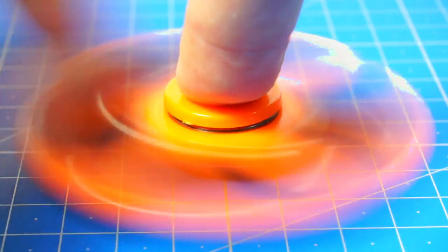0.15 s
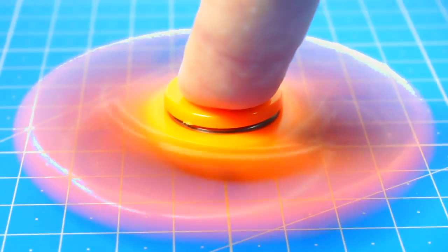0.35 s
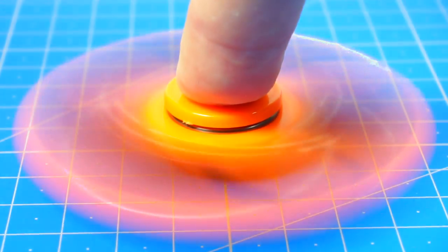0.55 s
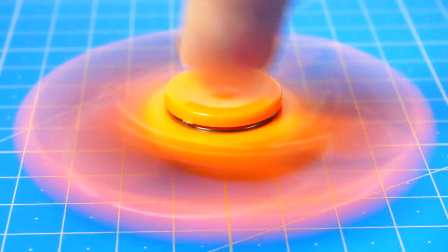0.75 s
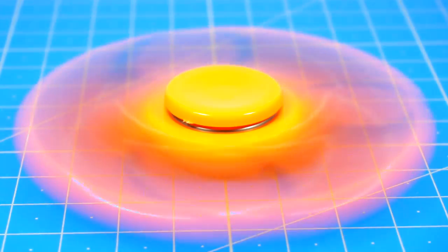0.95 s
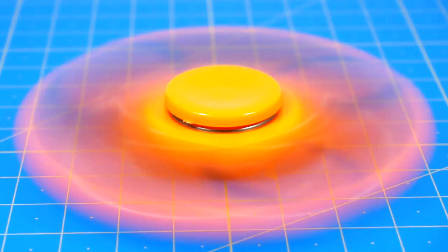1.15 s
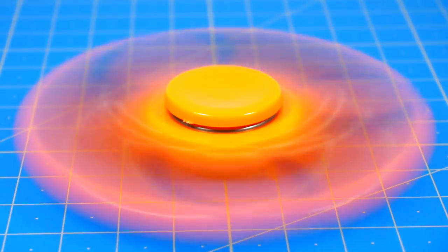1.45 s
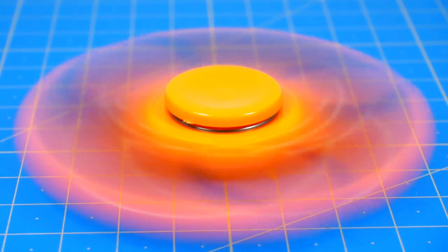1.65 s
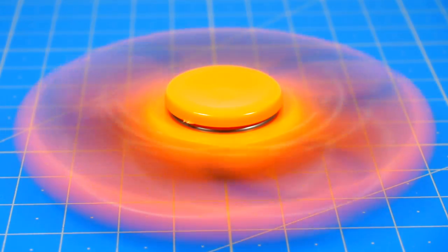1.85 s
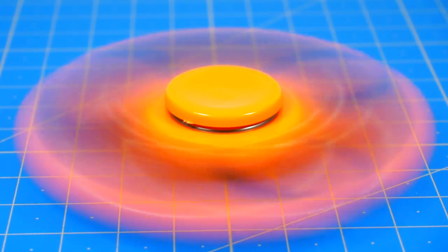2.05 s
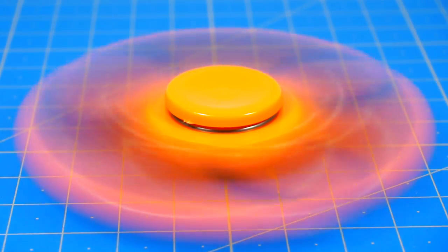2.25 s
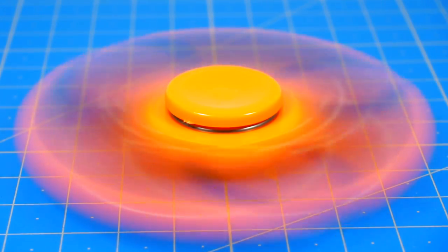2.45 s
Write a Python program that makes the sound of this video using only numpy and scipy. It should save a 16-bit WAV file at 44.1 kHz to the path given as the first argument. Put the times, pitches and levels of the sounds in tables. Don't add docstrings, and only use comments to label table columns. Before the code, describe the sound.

Close up, a finger flicks a plastic spinner, bumping the table; its bearing balls whir continuously, duller at first, then bright and hissy, with tiny ticks and cap chatter over faint low rumble.

```python
import sys
import numpy as np
from scipy import signal
from scipy.fft import rfft, irfft
from scipy.io import wavfile
from scipy.ndimage import uniform_filter1d

SR = 44100
rng = np.random.default_rng(int(sys.argv[2]) if len(sys.argv) > 2 else 0)


def wav_record(signal):
    frames = np.transpose(np.atleast_2d(signal))
    bounded = np.clip(frames, -1, 1)
    quanta = np.round(bounded * 32767).astype(np.int16)
    wavfile.write(sys.argv[1], SR, quanta)


def makeup_ratio(level_db):
    decades = np.asarray(level_db, float) / 20
    return 10 ** decades


N = 114660

# (time [s], rattle level [dB], cap freedom [0-1])
SPIN = [(.225, 5.5, 0), (.24, 7, 0), (.32, 1.5, 0), (.6, -0.5, 0.17), (.73, 0.5, 0.5), (.82, 0, 0.78),
        (1., -0.5, 0.94), (1.3, 1.5, 0.88), (1.75, 1, 0.93), (2.1, .5, 0.95), (2.6, 1, 0.87)]
# (frequency [Hz], width [Hz], held level [dB], free level [dB])
RINGS = [(1032, 67, -52.5, -59), (1445, 145, -47, -79), (2000, 190, -59, -52.5), (2570, 185, -87, -47),
         (3270, 330, -47, -60), (4000, 260, -63, -66), (6060, 610, -64, -54.5), (5160, 450, -55, -52),
         (7120, 640, -65, -46.5), (7896, 490, -60, -41), (9830, 1430, -44.5, -48), (9980, 320, -58, -56),
         (13100, 1600, -57.5, -50.5), (14100, 940, -53.5, -47.5), (15430, 790, -50, -44.5)]
# (lobes [per turn], depth [dB], angle [rad])
RING_LOBES = [(2, 1, 3.1), (1, .3, 0), (2, .6, 0), (1, 2.6, 2.2), (1, .3, 1), (3, .6, .4), (2, 4, -1.4),
              (2, 1.5, -1.4), (2, 4, .2), (1, 2.6, 0), (1, 1, -.7), (3, 1, 1.6), (4, .6, 1.3),
              (3, 1.3, -.1), (3, 2, -.6)]
# (frequency [Hz], width [Hz], depth [0-1])
NOTCHES = [(3270, 150, .5), (5650, 200, .4), (8260, 110, .45), (10650, 300, .45)]
# (frequency [Hz], density [dB])
ROLLING_HISS = [(180, -48), (300, -5), (519, -5), (1430, -6.5), (2590, -6), (3730, -8.5), (7740, -14.5),
                (11000, -14), (15800, -9.5)]
# (time [s], level [dB], length [s])
CAP_RATTLES = [
    (1.575, -38.5, 0.018),
    (1.667, -36, 0.0057),
    (1.998, -39, 0.012),
    (2.162, -37.5, 0.0042),
    (2.176, -35.5, 0.0034),
    (2.334, -42.5, 0.017),
    (2.484, -37, 0.0065),
    (2.496, -39.5, 0.0054),
    (2.512, -32, 0.0052),
]
# (time [s], level [dB], ring frequency [Hz], spread [Hz])
BALL_CATCHES = [(0.2768, -38, 6950, 6000), (0.297, -42, 13600, 2500), (.55, -32.5, 10100, 4000),
                (.58, -41, 9900, 2500), (.6, -39, 9850, 2000), (0.637, -35, 9830, 3000),
                (.642, -36, 9900, 1500), (0.679, -40, 9750, 4000), (.697, -38, 10000, 2500),
                (.7, -28, 15500, 1500), (0.737, -34, 9700, 3000), (0.9595, -35, 7800, 2000),
                (1.7962, -31.5, 7900, 2000), (1.865, -34, 7600, 1200)]
# (time [s], level [dB], length [s], brightness [Hz])
SCRAPES = [(0.2185, -14, 0.0071, 14500), (0.222, -49, 0.0067, 3030), (0.229, -18, 0.0052, 10100),
           (0.2382, -16.5, 0.0038, 7040), (.2435, -13.5, 0.0027, 12100), (0.246, -33.5, 0.026, 4000),
           (0.273, -39.5, 0.036, 1580), (0.3795, -25, 0.00097, 4500), (0.5275, -25, 0.002, 9000),
           (1.576, -39, 0.027, 4000), (2.331, -38, 0.0015, 6000)]
# (frequency [Hz], density [dB])
SKIN_SPECTRUM = [(2000, 15), (5000, 4), (7200, 0), (8800, -1.5), (10200, 6.5), (12000, 5.5), (14000, 0),
                 (16000, 3.5)]
# (time [s], level [dB], lowpass [Hz])
KNOCKS = [
    (.231, -18, 2940),
    (0.2407, -9.5, 4000),
    (0.2448, -13.5, 2880),
    (0.2547, -14, 1750),
    (.268, -14.5, 1990),
    (.286, -15.5, 880),
    (.308, -17.5, 600),
    (.335, -23.5, 1530),
    (.35, -28, 2000),
]
# (frequency [Hz], level [dB], T60 [s])
TABLE_MODES = [(110, -8, 0.17), (170.3, -13, 0.25), (205.7, -7.5, 0.25), (277.4, -1, 0.13),
               (352.6, -2, 0.096), (407, -10, 0.1), (571, -6, 0.085), (721, -20.5, 0.18),
               (780, -10.5, 0.16), (1048, -15, 0.16), (1402, -21, 0.17), (1756, -7.5, 0.061),
               (1795, -24, 0.12), (2030, -18, 0.13)]
# (frequency [Hz], density [dB])
THUD_SPECTRUM = [(80, -19), (250, 7), (2000, -10), (8000, -49)]
# (time [s], level [dB], length [s], frequency [Hz])
SWELLS = [(0.231, -31, 0.0099, 240), (.2418, -7.5, 0.00398, 680), (0.241, -28, 0.0467, 110),
          (.262, -19, .025, 204), (0.271, -19.5, 0.0209, 348), (0.285, -17.5, 0.0157, 285),
          (0.317, -15.5, 0.03385, 290), (0.304, -31.5, 0.0293, 583), (0.347, -34, .04, 602),
          (0.391, -40.5, .03, 745), (.635, -44, 0.034, 523), (0.331, -31, 0.0245, 283),
          (0.387, -57, 0.01, 338), (0.399, -25, 0.013, 355), (0.421, -37.5, 0.037, 390),
          (0.446, -34.5, 0.015, 376), (0.493, -31.5, 0.0126, 369), (0.553, -39.5, 0.014, 347),
          (0.752, -43.5, .04, 601), (0.758, -40.5, .04, 1043), (0.804, -33.5, 0.017, 220),
          (0.823, -40.5, 0.052, 282.6), (0.867, -39.5, .06, 410)]
# (time [s], level [dB])
TABLE_SHAKE = [(0.4, -39), (0.43, -41.5), (0.72, -53.5), (0.82, -35.5), (0.9, -46), (0.98, -39), (1.1, -51),
               (1.16, -42), (1.22, -50.5), (1.35, -50), (1.66, -48.5), (1.69, -42.5), (1.8, -47),
               (1.88, -55), (2.12, -48), (2.15, -63), (2.35, -48.5), (2.6, -50)]
# (time [s], level [dB])
FINGER_PRESS = [
    (.1, -68),
    (.14, -48.5),
    (.21, -43.5),
    (.24, -61),
    (.3, -102),
]
# (frequency [Hz], density [dB])
DRONE = [(60, 3), (120, 4), (200, 8), (400, 1), (600, -7), (1500, -6.5)]
# (frequency [Hz], density [dB])
DRONE_SIDE = [(60, -11), (250, 1.5), (600, -3), (1500, -14.0), (3000, -42)]
# (frequency [Hz], density [dB])
AIR_SPECTRUM = [(15, -26), (25, -11.5), (107, -10.5), (276, -19.5), (371, -18), (513, -22), (710, -22.5),
                (3780, -30.5), (15800, -30)]
# (time [s], level [dB])
TRAFFIC_LEVEL = [(0, -57), (.22, -52), (.27, -43), (.34, -51), (.4, -55), (.5, -59), (1.05, -58),
                 (1.3, -45.5), (1.55, -45), (1.8, -45.5), (2.05, -68), (2.35, -50.5), (2.6, -46)]
# (time [s], gain [dB])
FADE_IN = [
    (0, -9.5),
    (.12, -4),
    (.21, 0),
]


def evened(x):
    return x / np.sqrt(np.mean(x ** 2) + 1e-20)


def curve(rows, axis=1):
    rows = np.array(rows)
    return np.interp(np.arange(N) / SR, rows[:, 0], rows[:, axis])


def noise():
    return rng.standard_normal(N)


def coloured(x, points):
    f_hz, density_db = np.transpose(points)
    hz = np.fft.rfftfreq(N, 1 / SR)
    gain = makeup_ratio(np.interp(np.log(hz + 1), np.log(f_hz + 1), density_db))
    return evened(irfft(rfft(x) * gain, N))


def resonate(x, hz, width_hz):
    r = np.exp(-np.pi * width_hz / SR)
    return signal.lfilter([1, 0, -1], [1, -2 * r * np.cos(2 * np.pi * hz / SR), r * r], x)


def filtered(x, order, hz, kind):
    return signal.lfilter(*signal.butter(order, hz, kind, fs=SR), x)


def drift(length_s):
    size = max(int(length_s * SR), 2)
    smooth = uniform_filter1d(uniform_filter1d(noise(), size), size)
    return evened(np.tanh(evened(smooth) / 2))


def add(mix, start_s, sound):
    part = mix[round(start_s * SR):][:len(sound)]
    part += sound[:len(part)]


def room(x):
    level_db, t60_s, turns_hz = -1.5, 0.25, 7
    t, out = np.arange(SR // 3) / SR, 0
    for k in range(3):
        tail = rng.standard_normal((2, len(t))) * makeup_ratio(-60 * t / t60_s) * (t > .002)
        tail = tail / np.linalg.norm(tail[0])
        share = np.sqrt(2 / 3) * np.cos(2 * np.pi * (np.arange(N) / SR * turns_hz + k / 3))
        out = out + signal.oaconvolve((x * share)[None], tail, axes=1)[:, :N]
    return makeup_ratio(level_db) * out


def spin():
    started = np.arange(N) / SR > SPIN[0][0]
    return makeup_ratio(curve(SPIN)) * started, curve(SPIN, axis=2)


def bearing():
    turns_per_s, slowing_per_s2 = 15.94, .44
    lift_s, lift_length_s, rub_db_per_s = 0.74, .02, 12.5
    flicker_db, lag = 1.63, 17
    hiss_db, hiss_held_db, hiss_same = -37, 5, 0.073
    t = np.arange(N) / SR
    level, free = spin()
    turn = 2 * np.pi * (turns_per_s * t - slowing_per_s2 * t ** 2 / 2)
    lifted = np.clip((t - lift_s) / lift_length_s, 0, 1)
    low, high, drive = cap(), np.zeros(N), ticks()
    for (hz, width_hz, held_db, free_db), (lobes, depth_db, angle) in zip(RINGS, RING_LOBES):
        loose = free
        if 9000 < hz < 11000:
            held_db = held_db + rub_db_per_s * (t - lift_s)
            loose = lifted
        ring = np.roll(drive, rng.integers(N))
        for _ in range(2):
            ring = resonate(ring, hz, 1.47 * width_hz)
        db = held_db + (free_db - held_db) * loose
        db = db + depth_db * np.cos(lobes * turn + angle) + flicker_db * drift(0.0042)
        add(low if hz < 3500 else high, 0, evened(ring) * makeup_ratio(db) * level)
    a, b = (coloured(ticks(), ROLLING_HISS) for side in "lr")
    hiss = np.array([np.roll(hiss_same * b, lag) + a, b])
    hiss = hiss * makeup_ratio(hiss_db - hiss_held_db * free + 1.9 * drift(0.015)) * level
    left = np.roll(low, lag) + high * makeup_ratio(2.0)
    right = low * makeup_ratio(3.0) + high * makeup_ratio(-1.0)
    return notched(np.array([left, right]) + room(low + high) + hiss)


def ticks():
    ticks_per_s, spread_db = 6500, 3.5
    size = makeup_ratio(spread_db * np.minimum(rng.exponential(1, N), 4))
    return evened(size * rng.choice([-1., 1.], N) * (rng.random(N) < ticks_per_s / SR))


def cap():
    level = np.zeros(N)
    for s, db, length_s in CAP_RATTLES:
        add(level, s - length_s / 2, makeup_ratio(db) * np.hanning(int(2 * length_s * SR)))
    return level * evened(resonate(noise(), hz=2514, width_hz=280))


def notched(x):
    hz = np.fft.rfftfreq(N, 1 / SR)
    dips = [1 - depth * np.exp(-((hz - f) / width) ** 2) for f, width, depth in NOTCHES]
    return irfft(rfft(x) * np.prod(dips, axis=0), N)


def catches():
    decay_s = 0.0027
    out, u = np.zeros(N), np.arange(600) / SR
    for s, db, hz, width_hz in BALL_CATCHES:
        puff = rng.standard_normal(600) * np.exp(-u / decay_s)
        add(out, s, evened(resonate(puff, min(hz, 16000), width_hz)) * makeup_ratio(db - 9.5))
    return out + room(out)


def flick():
    skin, wood = scrapes(), knocks()
    sides = makeup_ratio(np.array([[1.5], [-1.5]]))
    return skin * sides + 0.49 * room(skin) + wood + 0.23 * room(filtered(wood, 1, 700, "high"))


def scrapes():
    skin = np.zeros(N)
    for s, db, length_s, hz in SCRAPES:
        u = np.arange(int(3 * length_s * SR)) / (length_s * SR)
        grit = coloured(noise(), SKIN_SPECTRUM)[:len(u)]
        grit = filtered(grit, 2, [hz / 1.63, min(hz * 2.4, 19000)], "band")
        add(skin, s, makeup_ratio(db) * evened(grit) * np.minimum(u / 0.52, 1) * np.exp(-u ** 2))
    return skin


def knocks():
    ring_share, thud_db, thud_t60_s, soft_turns = 0.87, -10.5, 0.16, 1.3
    wood, t = np.zeros(N), np.arange(SR // 2) / SR
    for s, db, hz in KNOCKS:
        body = coloured(noise(), THUD_SPECTRUM)[:len(t)] * makeup_ratio(thud_db - 60 * t / thud_t60_s)
        for mode_hz, mode_db, t60_s in TABLE_MODES:
            decay = makeup_ratio(mode_db - 60 * t / (ring_share * min(t60_s, .4)))
            body = body + rng.uniform(0.13, 1.41) * decay * np.sin(2 * np.pi * mode_hz * t)
        body = body * np.minimum(t * hz / soft_turns, 1)
        add(wood, s, makeup_ratio(db) * filtered(body, 1, [hz / 9, hz], "band"))
    return filtered(wood, 2, 95.3, "high")


def swells():
    out = np.zeros(N)
    for s, db, length_s, hz in SWELLS:
        t = np.arange(int(length_s * SR * 1.37)) / SR
        bloom = np.sin(np.pi * (t / t[-1]) ** 0.61) ** 2
        add(out, s - length_s / 2, makeup_ratio(db) * bloom * np.sin(2 * np.pi * hz * t))
    return out


def table_hum():
    held_db, free_db, lump_db = -50, -50.5, 2
    level, free = spin()
    mode = evened(resonate(noise(), hz=287.7, width_hz=10.8))
    mode = evened(mode / (uniform_filter1d(abs(mode), size=1500) + 0.3))
    shake = makeup_ratio(curve(TABLE_SHAKE) + lump_db * drift(0.11)) * level
    hum = mode * (shake + makeup_ratio(curve(FINGER_PRESS)))
    a = coloured(noise(), [(30, -30)] + DRONE + [(3000, -33.5)])
    b = coloured(noise(), DRONE_SIDE)
    drone = makeup_ratio(held_db + (free_db - held_db) * free + 3.1 * drift(0.036)) * level
    return hum + drone * np.array([a + 1.43 * b, a - 0.91 * b])


def background():
    air_db, same = -47.5, 0.078
    a, b = (coloured(noise(), AIR_SPECTRUM) for side in "lr")
    b = filtered(b - a, 1, 200, "high") + a
    return makeup_ratio(air_db) * np.array([a, same * a + np.sqrt(1 - same ** 2) * b]) + traffic()


def traffic():
    hz, width_hz, engine_share, second_db = 48.6, 35, 3.7, -7.5
    rumble = evened(resonate(resonate(noise(), hz, width_hz), hz, 2 * width_hz))
    turn = 2 * np.pi * hz * np.arange(N) / SR + 0.47 * drift(0.086)
    engine = np.sin(turn) + makeup_ratio(second_db) * np.sin(2 * turn)
    return evened(rumble + engine_share * engine) * makeup_ratio(curve(TRAFFIC_LEVEL))


def scene():
    return bearing() + catches() + flick() + swells() + table_hum() + background()


def top_cut(x):
    return signal.sosfilt(signal.butter(12, 16300, fs=SR, output="sos"), x)


def record(dry):
    edge = signal.firwin(1023, 15725, window=("kaiser", 9), fs=SR)[None]
    mix = signal.oaconvolve(dry * makeup_ratio(curve(FADE_IN)), edge, "same")
    return top_cut(mix)


dry = scene()
out = record(dry)
wav_record(out)
```